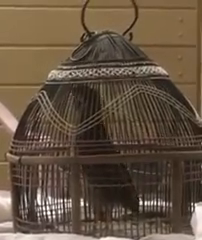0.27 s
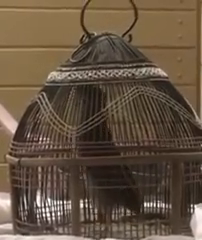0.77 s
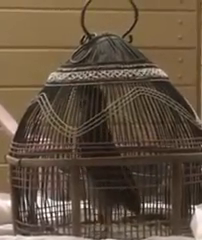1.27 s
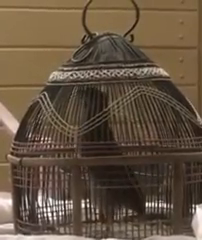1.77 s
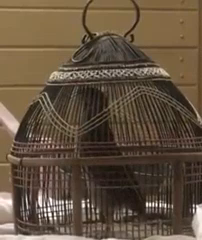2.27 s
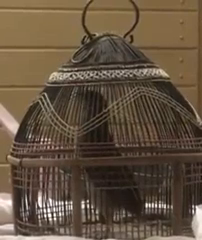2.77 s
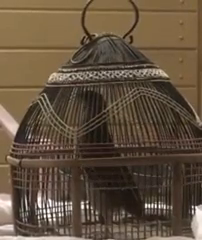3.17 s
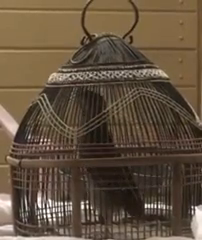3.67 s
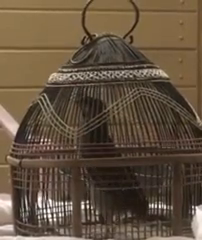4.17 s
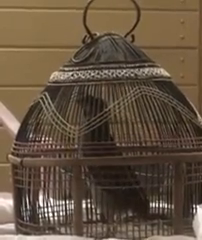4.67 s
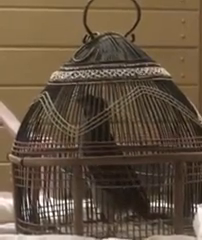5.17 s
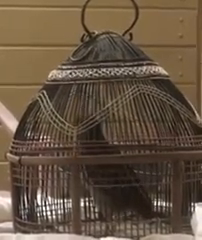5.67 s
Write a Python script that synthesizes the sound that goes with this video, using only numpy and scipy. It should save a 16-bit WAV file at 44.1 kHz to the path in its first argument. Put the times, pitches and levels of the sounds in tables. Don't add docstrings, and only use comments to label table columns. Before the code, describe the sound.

A caged quail very near the microphone calls in a hard-walled yard. Each call has three short notes: a slightly softer one, a gap of about a fifth of a second, then two in quick succession. Every note has a soft low lead-in that snaps up into a loud, clear whistle; the third lead-in is hoarse, with a faint croak. Walls answer at once, with a ringing tail of over half a second. One call's echo is already fading at the start; further calls begin near 0.5, 1.5, 2.6 and 3.6 seconds, then stop. Low traffic rumbles throughout, with faint distant dove coos until about 3.6 and tiny high peeps around 3. From about 4.4 to 6, thin, distant metal squeals and rubs, strongest after 5. At 4.9 a small, hoarse, torn chirp echoes. The treble has a patchy, coarse recorded texture.

```python
import sys
import numpy as np
from scipy import signal
from scipy.fft import rfft, irfft, next_fast_len
from scipy.io import wavfile
from scipy.ndimage import uniform_filter1d, minimum_filter1d, map_coordinates

SR = 44100
rng = np.random.default_rng(int(sys.argv[2]) if len(sys.argv) > 2 else 0)


def bounce(signal):
    frames = np.transpose(np.atleast_2d(signal))
    limited = np.clip(frames, -1, 1)
    pcm = np.round(limited * 32767).astype(np.int16)
    wavfile.write(sys.argv[1], SR, pcm)


def rack_gain(trim_db):
    fader = np.asarray(trim_db, float)
    return 10 ** (fader / 20)


N = 261070
PRE = SR

# start_s, wait_to_second_note_s, wait_to_third_note_s, effort_db
QUAIL_PHRASES = [
    (-.704, .212, .105, 0),
    (.3153, .2115, .1053, 0),
    (1.334, .2107, .1065, 0),
    (2.3593, .2101, .1077, 0),
    (3.4272, .213, .1088, 0),
]
# time_from_note_s, pitch_hz, level_db
WHIP = [(-.009, 1410, -27.5), (-.004, 1610, -21.5), (.0013, 1820, -6.5), (.0045, 1895, -4.5),
        (.0078, 2200, -7.5), (.0102, 2850, -4), (.0128, 4150, -15), (.0146, 4950, -26.5),
        (.0168, 5200, -62)]
# time_before_note_s, first_pitch_hz, last_pitch_hz, level_db
LEAD_INS = [
    (.024, 1395, 1385, -38),
    (.033, 1250, 1320, -32),
    (.068, 1080, 1320, -30),
]
NOTE_DB = [
    -3,
    0,
    0,
]
WHIP_TOP_DB = [
    -3.5,
    -1.5,
    .3,
]
HOARSENESS = [
    .003,
    .006,
    .038,
]
# multiple, level_db
WHISTLE_OVERTONES = [(2, -30), (3, -39), (4, -52)]
# time_from_note_s, pitch_hz, level_db
CROAK = [(-.07, 600, -80), (-.062, 620, -44), (-.045, 570, -47), (-.027, 640, -48), (-.015, 790, -39),
         (-.004, 820, -70)]
# delay_s, level_db
WALL_ECHOES = [(.0024, -6), (.0052, -9), (.008, -12), (.0118, -11), (.0185, -13), (.03, -16), (.044, -15)]
# frequency_hz, t60_s
YARD_DECAY = [(500, .55), (1400, .72), (2000, .76), (2700, .74), (4000, .66), (5200, .58), (7000, .4),
              (12000, .2)]
# frequency_hz, level_db
ECHO_COLOUR = [(600, 1.5), (1200, -1.5), (1850, -4.5), (2600, .3), (3500, .3), (5050, .3), (5500, -6),
               (9000, -3)]
# start_s, length_s, pitch_hz, level_db
DOVE_COOS = [
    (-.3, .62, 435, -57),
    (.8, .6, 425, -56),
    (2.0, .6, 408, -54),
    (3.12, .52, 418, -57),
]
# frequency_hz, level_db_per_hz
TRAFFIC = [(15, -37), (35, -14), (60, -.5), (90, -2), (130, .5), (170, -1), (300, -11), (465, -18),
           (800, -25), (1340, -25.5), (2200, -25), (4500, -30), (7500, -41), (15600, -52)]
# start_s, length_s, pitch_hz, level_db, drift_db
PEEPS = [
    (3.06, .27, 3885, -67, -5),
    (2.82, .27, 5240, -74, -1),
    (3.32, .08, 5200, -75, 0),
]
# frequency_hz, level_db_per_hz
FRICTION = [(350, -20), (600, 3), (1500, -1.5), (2500, -2.5), (4000, -4), (5500, -12), (9000, -30)]
FRICTION_S = (4.1, 4.8, 4.95, 5.45, 5.95)
FRICTION_DB = (-80, -74, -66, -64, -71)
# start_s, length_s, pitch_hz, level_db, drift_db
WHINES = [
    (4.44, .49, 6190, -73, 9),
    (5.56, .38, 6170, -72, -8),
]
# start_s, length_s, pitch_hz, level_db, drift_db
SQUEALS = [
    (4.46, .45, 1503, -71, -7),
    (4.81, .5, 1185, -63, 2),
    (5.3, .5, 1203, -65, -12),
    (5.09, .88, 1499, -54, -5),
]
# second_db, third_db
SQUEAL_OVERTONES_DB = [(-20, -25), (-9, -22), (-8, -20), (-5, -14)]
# time_s, pitch_hz, level_db
CHIRP = [(4.882, 2550, -80), (4.889, 2780, -47), (4.94, 3800, -42.5), (4.956, 4650, -39.5),
         (4.98, 4350, -38.5), (5.005, 4200, -39.5), (5.03, 3900, -57)]
# frequency_hz, level_db_per_hz
CHIRP_BREATH = [(4120, -34), (7000, -4), (7190, -8), (8050, -2), (13800, -13), (15600, -18)]
# frequency_hz, level_db_per_hz
TOP_BAND = [(3120, -39), (5300, -9), (6210, 2), (6790, -17), (7670, -1), (9960, -13), (11100, -29),
            (12200, -21), (13100, -19), (13300, -27), (14500, -22), (14700, -30), (15600, -24)]
# slot, level_db, opens_at_db
TOP_TONES = [(6, -66, -26), (7, -70, -24), (8, -72, -20), (9, -67, -22), (10, -67, -20), (11, -72, -19)]


def along(points, hz):
    f, v = np.transpose(points)
    return np.interp(np.log(hz + 1), np.log(f + 1), v)


def unit(x):
    return x / np.sqrt(np.mean(x ** 2) + 1e-20)


def hiss(spectrum):
    m = next_fast_len(N)
    colour = rack_gain(along(spectrum, np.fft.rfftfreq(m, 1 / SR)))
    return unit(irfft(rfft(rng.standard_normal(m)) * colour, m)[:N])


def wobble(rate, n):
    knots = rng.standard_normal(size=800)
    return unit(map_coordinates(knots, [np.arange(n) * rate / SR]))


def columns(rows):
    s, *cols = np.transpose(rows)
    t = np.arange(s[0], s[-1], 1 / SR)
    return round(s[0] * SR), [np.interp(t, s, c) for c in cols]


def add(track, start, x):
    part = track[PRE + start:][:len(x)]
    part += x[:len(part)]


def whistle(hz, db, rough, rate):
    turn = 2 * np.pi * np.cumsum(hz * (1 + rough * wobble(rate, len(hz)))) / SR
    return turn, rack_gain(db + 40 * rough * wobble(rate, len(hz)))


def lead_in(before_s, first_hz, last_hz, db):
    end_s, attack_s = -.013, .008
    risen_s = attack_s - before_s
    bend_s = -before_s + .6 * (before_s + end_s)
    return [(-before_s, .86 * first_hz, db - 40),
            (risen_s, first_hz, db - 3),
            (max(bend_s, risen_s + 1e-4), .75 * first_hz + .25 * last_hz, db),
            (end_s, last_hz, db - 1.5)]


def quail_note(lead, note_db, effort_db, top_db, shake):
    start, (hz, db) = columns(lead_in(*lead) + WHIP)
    db = db + note_db + effort_db + top_db * np.clip((hz - 2200) / 1800, 0, 1)
    rough = shake * np.clip((1400 - hz) / 150, 0, 1) + .003
    turn, gain = whistle(hz, db, rough, rate=250)
    tone = np.sin(turn)
    for multiple, level_db in WHISTLE_OVERTONES:
        tone = tone + rack_gain(level_db + note_db) * np.sin(round(multiple) * turn)
    return start, gain * tone


def croak(air):
    start, (hz, db) = columns(CROAK)
    turn, gain = whistle(hz, db, rough=.06, rate=300)
    rasp = rack_gain(db - 11) * (1 + np.cos(turn)) * air[:len(db)]
    return start, gain * np.sin(turn) + rasp


def quail():
    out, air = np.zeros(PRE + N), hiss(TOP_BAND)
    for *waits, effort_db in QUAIL_PHRASES:
        times = np.cumsum(waits)
        notes = zip(times, LEAD_INS, NOTE_DB, WHIP_TOP_DB, HOARSENESS)
        for s, lead, note_db, top_db, shake in notes:
            start, note = quail_note(lead, note_db, effort_db, top_db, shake)
            add(out, start + round(s * SR), note)
        third = round(times[-1] * SR)
        start, low_voice = croak(air[abs(third):])
        add(out, start + third, low_voice)
    return out


def yard(x, direct_db, tail_db):
    hz, t, z = signal.stft(rng.standard_normal(SR), SR, nperseg=256)
    decay = rack_gain(-60 * t / along(YARD_DECAY, hz)[:, None])
    tail = signal.istft(z * decay, SR, nperseg=256)[1][:SR]
    age = np.arange(SR) / SR
    build_up = 1 - np.exp(-(age / .005) ** 2)
    scatter = 1 + 1.9 * rack_gain(-60 * age / .15)
    tail *= build_up * scatter
    echoes = rack_gain(tail_db) * tail / np.linalg.norm(tail)
    for delay_s, db in WALL_ECHOES:
        echoes[round(delay_s * SR)] += rack_gain(direct_db + db)
    colour = rack_gain(along(ECHO_COLOUR, np.fft.rfftfreq(SR, 1 / SR)))
    echoes = irfft(rfft(echoes) * colour, SR) * (age < .9)
    return (rack_gain(direct_db) * x + signal.fftconvolve(x, echoes)[:len(x)])[PRE:]


def far_tones(tables, steady, rate):
    out = np.zeros(PRE + N)
    for rows in tables:
        start, (hz, *levels) = columns(rows)
        n = len(hz)
        turn = 2 * np.pi * np.cumsum(hz) / SR
        to_edge = np.minimum(np.arange(n), np.arange(n)[::-1])
        fade = np.minimum(1, to_edge / 900)
        for multiple, db in enumerate(levels, 1):
            paths = steady + wobble(rate, n) + 1j * wobble(rate, n)
            tone = unit(np.imag(paths * np.exp(1j * multiple * turn)))
            add(out, start, fade * rack_gain(db + .7) * tone)
    return out


def coo(s, length, hz, db):
    crest, edge_db = .55, -9
    return [(s, hz, db + edge_db),
            (s + .6 * crest * length, hz, db - 1.5),
            (s + crest * length, 1.08 * hz, db),
            (s + .85 * length, 1.05 * hz, db - 2.5),
            (s + length, 1.05 * hz, db + edge_db)]


def dove():
    return far_tones([coo(*row) for row in DOVE_COOS], steady=1.1, rate=40)


def traffic():
    return rack_gain(-56 + .8 * wobble(3, N)) * hiss(TRAFFIC)


def held(s, length, hz, db, drift_db, overtones_db=()):
    onset_s, fade_s, hush_db = min(.05, length / 3), min(.04, length / 3), -20
    shape = [(0, hush_db, 0), (onset_s, 0, 0), (length - fade_s, 0, drift_db), (length, hush_db, drift_db)]
    rows = []
    for t, edge_db, drift in shape:
        overtones = [db + edge_db + 2.6 * drift + o for o in overtones_db]
        rows.append((s + t, hz, db + edge_db + drift, *overtones))
    return rows


def peeps():
    return far_tones([held(*row) for row in PEEPS], steady=1.4, rate=65)


def metal():
    start, (friction_db,) = columns(list(zip(FRICTION_S, FRICTION_DB)))
    out = far_tones([held(*row) for row in WHINES], steady=.3, rate=130)
    squeals = [held(*row, overtones) for row, overtones in zip(SQUEALS, SQUEAL_OVERTONES_DB)]
    out += far_tones(squeals, steady=1.4, rate=65)
    add(out, start, rack_gain(friction_db) * hiss(FRICTION)[:len(friction_db)])
    return out


def chirp():
    out = np.zeros(PRE + N)
    start, (low_hz, low_db) = columns(CHIRP)
    age = np.arange(len(low_hz)) / SR
    low, low_gain = whistle(low_hz, low_db, rough=.04 + .45 * age, rate=1100)
    high_hz = 5200 + 1500 * (1 - np.exp(-age / .05))
    high_db = low_db + 2.5 - 3200 * age ** 2
    high, high_gain = whistle(high_hz, high_db, rough=.06, rate=1600)
    breath = rack_gain(low_db - 17) * hiss(CHIRP_BREATH)[:len(low)]
    add(out, start, low_gain * np.sin(low) + high_gain * np.sin(high) + breath)
    return out


def scene():
    birds = yard(quail(), direct_db=-.5, tail_db=-5) + yard(chirp(), direct_db=-6, tail_db=.3)
    far = dove() + peeps() + metal()
    return (birds + far[PRE:] + traffic())[None]


def patchy(x, depth_db, masked_db):
    hz, t, z = signal.stft(x, SR, nperseg=512)

    def spread(tile):
        return np.kron(tile, np.ones((4, 4)))[:len(hz), :len(t)]

    power = np.pad(abs(z) ** 2, ((0, -len(hz) % 4), (0, -len(t) % 4)), "edge")
    tile_power = power.reshape(65, 4, -1, 4).mean(axis=(1, 3))
    tile_db = 10 * np.log10(tile_power + 1e-20)
    chance = rng.standard_normal(tile_db.shape)
    loudest_near_db = -minimum_filter1d(-tile_db, size=5, axis=0)
    below_db = loudest_near_db - tile_db + 3 * chance
    band_hz = hz[:, None]
    crossover = (band_hz > 4700) & (band_hz < 7000)
    dropout_db = 25 * crossover / (1 + rack_gain(8 * (masked_db - spread(below_db))))
    gain_db = depth_db * spread(chance) * (band_hz > 5000) - dropout_db
    return signal.istft(z * rack_gain(gain_db), SR, nperseg=512)[1][:N]


def roll_off(x):
    return signal.sosfilt(signal.butter(12, 15710, fs=SR, output="sos"), x)


def record(dry):
    blocks = np.pad(3 * np.diff(dry[0]), (1, -N % 1024)).reshape(-1, 1024)
    loud_db = 10 * np.log10(np.mean(blocks ** 2, axis=1) + 1e-12)

    def per_sample(v):
        return uniform_filter1d(np.repeat(v, 1024)[:N], size=256)

    fill = rack_gain(.95 * per_sample(loud_db) - 39) * hiss(TOP_BAND)
    x = patchy(dry[0] + fill, depth_db=3.2, masked_db=14.5)
    for slot, db, opens_db in TOP_TONES:
        chance_db = 4 * rng.standard_normal(len(loud_db))
        opening = 1 + rack_gain(4 * (opens_db + chance_db - loud_db))
        gate = per_sample(rack_gain(.4 * (loud_db + 18)) / opening)
        slot_hz = (round(slot) + 1 / 8) * SR / 32
        x += rack_gain(db) * gate * np.sin(2 * np.pi * slot_hz * np.arange(N) / SR)
    return roll_off(x[None])


dry = scene()
out = record(dry)
bounce(out)
```